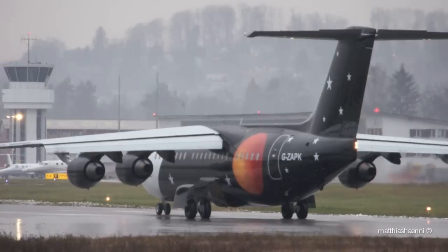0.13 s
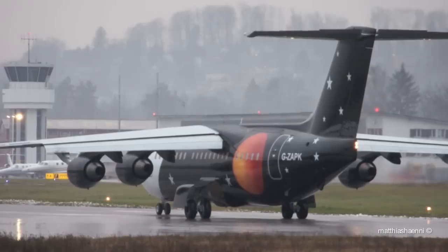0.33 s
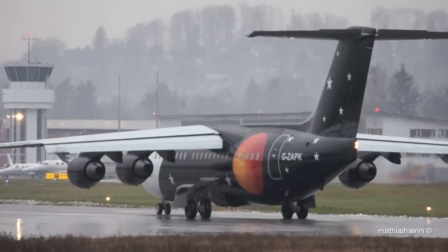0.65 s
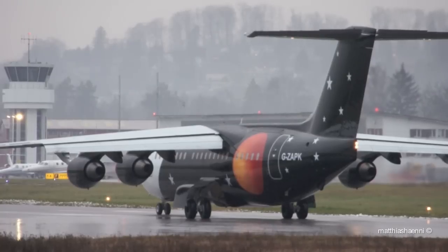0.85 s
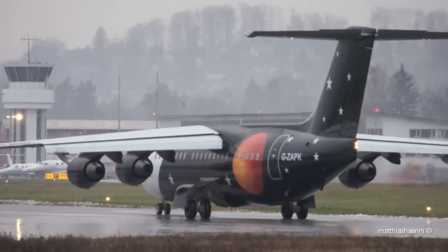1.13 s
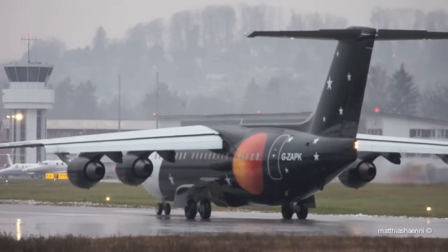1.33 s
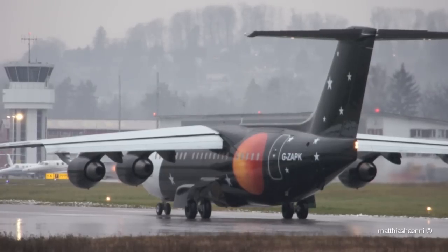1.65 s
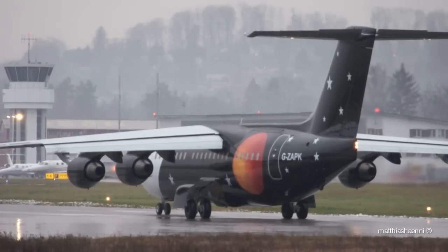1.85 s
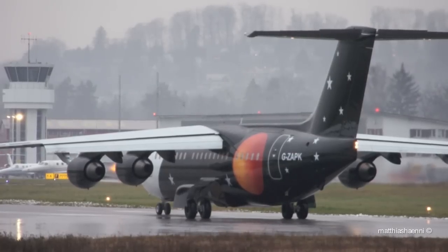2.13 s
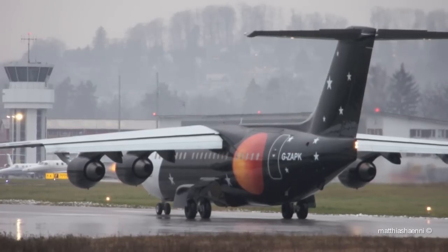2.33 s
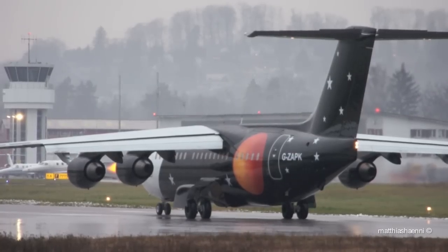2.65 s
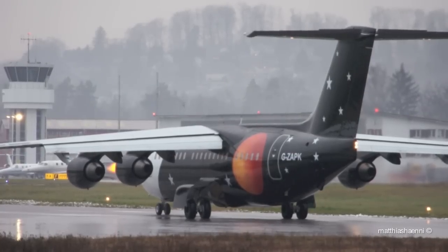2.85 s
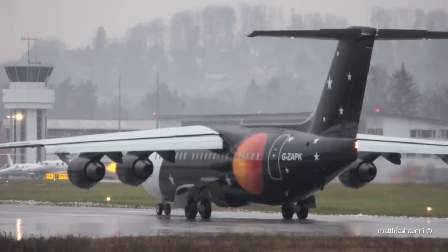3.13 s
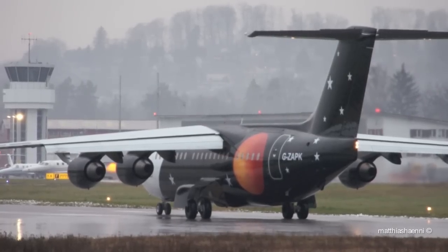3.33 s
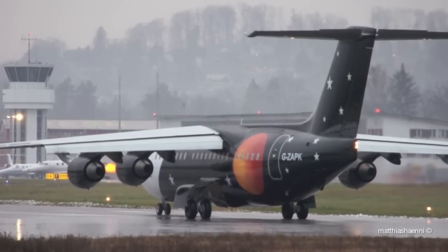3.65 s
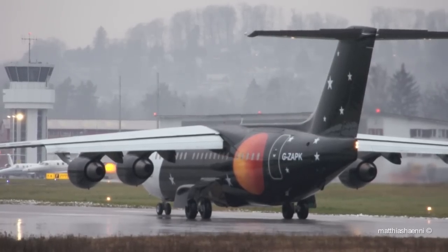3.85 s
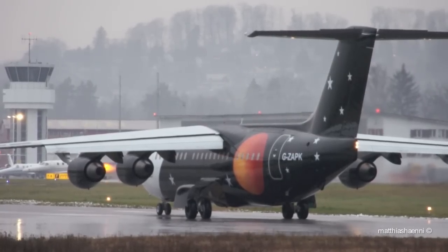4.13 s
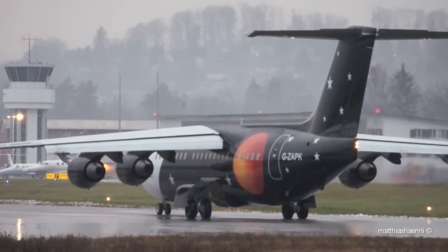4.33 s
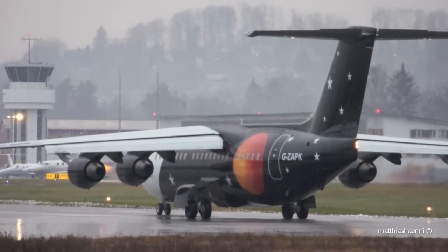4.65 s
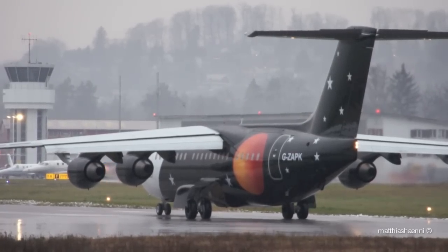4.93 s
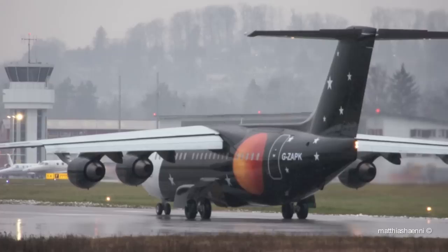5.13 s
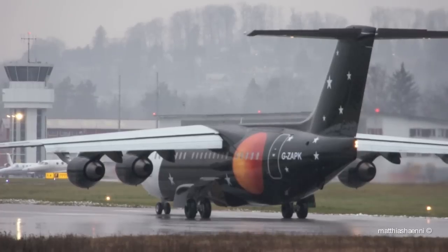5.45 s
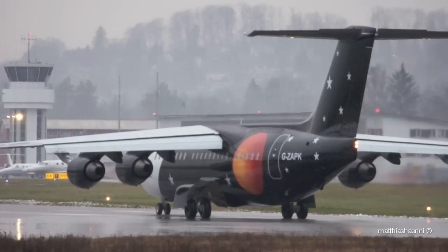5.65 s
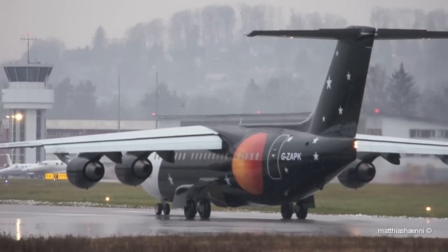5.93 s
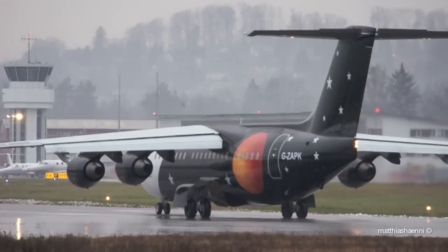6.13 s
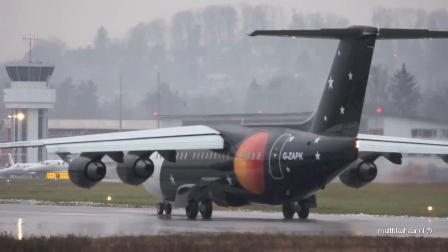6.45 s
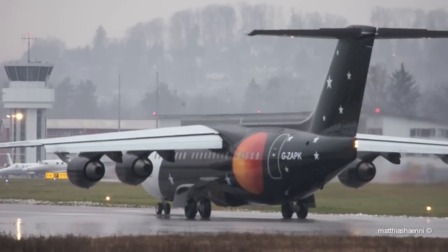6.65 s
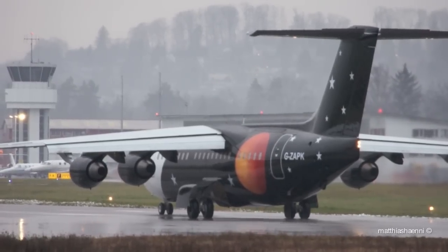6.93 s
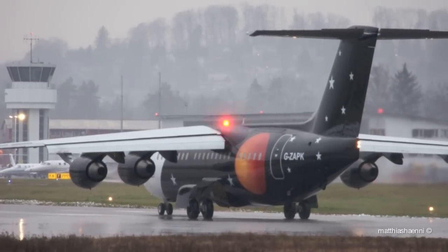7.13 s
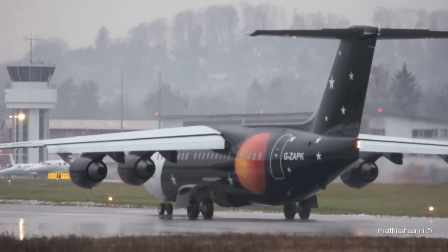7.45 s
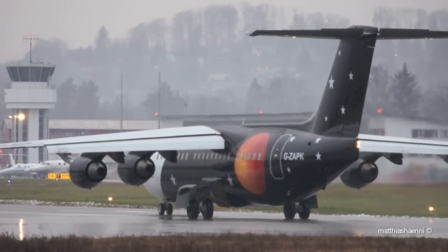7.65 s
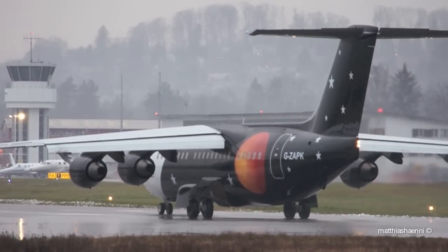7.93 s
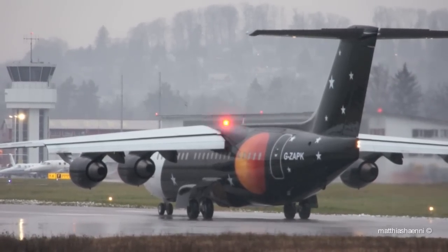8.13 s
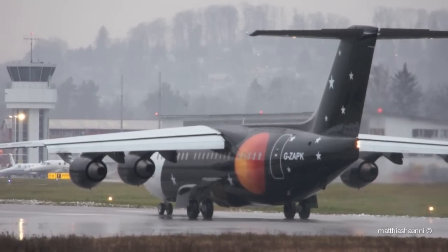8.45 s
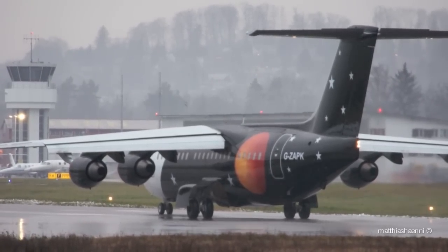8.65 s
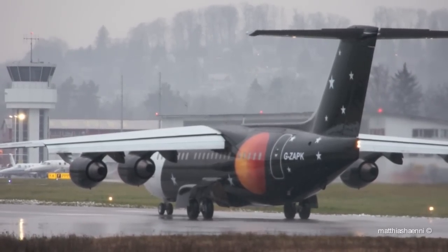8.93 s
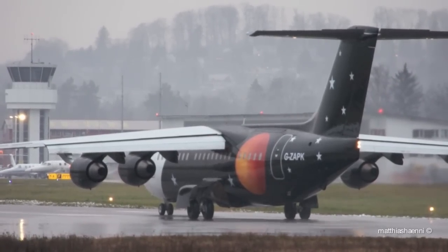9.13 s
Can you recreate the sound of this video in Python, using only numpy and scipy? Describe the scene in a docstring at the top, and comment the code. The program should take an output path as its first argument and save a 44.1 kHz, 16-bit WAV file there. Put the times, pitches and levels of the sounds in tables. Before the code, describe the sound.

Jet engines rise from a quiet, throbbing idle drone and thin whine to a piercing, breathy whistle over heavy, turbulent low rumble.

```python
"""A wet airfield: a four-engined jet airliner, seen from behind, spools up from idle.
The fans' blade tone, drifting phasors on a rising pitch, climbs from 1.6 to 4.4 kHz and swells in moving air;
faster engines add a breathy whistle above it. Two beating tones make a low idle drone, which drowns in the
growing rumble and roar of the exhaust, coloured noises driven by fan speed. Peaks drive the recorder's limiter."""
import sys
import numpy as np
from scipy import signal
from scipy.fft import rfft, irfft, next_fast_len
from scipy.io import wavfile
from scipy.ndimage import uniform_filter1d

SR = 44100
rng = np.random.default_rng(int(sys.argv[2]) if len(sys.argv) > 2 else 0)


def dump(signal):
    """Clip the signal to [-1, 1] and save it as 16-bit WAV at the path in sys.argv[1]."""
    limited = np.clip(np.atleast_2d(signal).T, -1, 1)
    pcm = np.round(limited * 32767).astype(np.int16)
    wavfile.write(sys.argv[1], SR, pcm)


N = 410130
TIME = np.arange(N) / SR  # s

# fan speed as blade-passing tone: (time [s], pitch [Hz])
FAN = [(0.0, 1574), (0.45, 1565), (0.85, 1619), (1.5, 1735), (2.0, 1861), (2.5, 1982), (3.0, 2212),
       (3.5, 2470), (4.0, 2670), (5.0, 3035), (6.0, 3450), (6.5, 3613), (7.0, 3812), (7.5, 3950),
       (8.0, 4095), (8.7, 4310), (9.3, 4440)]
# gusts on the upper exhaust noise and the fan tones: (time [s], peak [dB], length at half height [s])
GUSTS = [(.2, -0.5, .12), (1.08, -2, 0.11), (5.96, 2.5, 0.05), (6.04, -4, 0.11), (6.12, 1, 0.07),
         (6.2, -3.5, 0.03), (6.26, 2, 0.054), (6.49, 2.5, 0.027), (6.78, 3, 0.13), (6.97, -0.5, 0.032),
         (7.05, 3, 0.088), (7.26, 0.5, 0.042), (7.33, -4, 0.046), (7.53, 1, 0.06), (7.62, -4, 0.06),
         (7.74, 2.5, 0.053), (7.93, 0.2, 0.063), (8.08, -3, 0.045), (8.16, 3.5, 0.041), (8.4, 1.5, .04),
         (8.49, -1, 0.068), (8.63, 3, 0.13), (8.89, -1, 0.049), (9.27, -2.5, 0.039)]


def gain_of(db):
    """Decibels to amplitude."""
    return 10 ** (np.asarray(db) / 20)


def evened(x):
    """Scales to rms 1."""
    return x / np.sqrt(np.mean(abs(x) ** 2) + 1e-20)


def read(points, hz):
    """A spectrum table interpolated over log frequency."""
    f, value = np.transpose(points)
    return np.interp(np.log(hz + 1), np.log(f + 1), value)


def curves(rows):
    """Every column of a time table, sample by sample."""
    s, *columns = np.transpose(rows)
    return [np.interp(TIME, s, column) for column in columns]


def bumps(rows):
    """Gain of smooth swells and dips, each as long as its row says at half height."""
    return gain_of(sum(db * 2 ** -(2 * (TIME - s) / length_s) ** 2 for s, db, length_s in rows))


def phasor(hz):
    """Unit phasor that turns at the varying pitch hz."""
    return np.exp(2j * np.pi * np.cumsum(hz) / SR)


def wander(rate_hz, channels=2, order=2, clock=TIME):
    """Complex random drift of rms 1, with little in it faster than rate_hz on the given clock."""
    count = next_fast_len(N // 10)
    hz = np.fft.fftfreq(count, N / SR / count)
    a, b = rng.standard_normal((2, channels, count))
    slow = evened(np.fft.ifft((a + 1j * b) / (1 + abs(hz / rate_hz) ** order)))
    slow_s = np.linspace(0, N / SR, count)
    return np.array([np.interp(clock % (N / SR), slow_s, row) for row in slow])


def noise(colour, band_hz):
    """Two unrelated coloured noises, each with rms 1 inside the band."""
    size = next_fast_len(N, True)
    hz = np.fft.rfftfreq(size, 1 / SR)
    shape = gain_of(read(colour, hz))
    inside = (hz > band_hz[0]) & (hz < band_hz[1])
    power = np.sum(shape[inside] ** 2) / len(hz)
    white = rfft(rng.standard_normal((2, size)))
    return irfft(white * shape, size)[:, :N] / np.sqrt(power)


def patchy(x, depth_db, size=512):
    """Eddies along the path make neighbouring bands swell and fade together."""
    z = signal.stft(x, nperseg=size)[2]
    field = rng.standard_normal(z.shape[1:])
    for _ in range(2):
        field = uniform_filter1d(field, size=9, axis=0)  # over frequency
        field = uniform_filter1d(field, size=12, axis=1)  # over time
    return signal.istft(z * gain_of(depth_db * evened(field)), nperseg=size)[1][:, :N]


def follow_speed(knee_db, knee_hz, rise_db, fall_db, floor_db):
    """Noise gain against fan speed: one slope up to a knee, another beyond it, over a steady floor."""
    (blade_hz,) = curves(FAN)
    octaves = np.log2(blade_hz / knee_hz)
    slope_db = np.minimum(rise_db * octaves, -fall_db * octaves)
    return np.hypot(gain_of(knee_db + slope_db), gain_of(floor_db))


def drone(start_hz=67, end_hz=65.45, second_db=-11.0):
    """The combustors' low drone: two engines beat slowly against each other, and grow unsteady with power."""
    # (time [s], level [dB])
    drone_level = [(0, -25.5), (.28, -30), (.45, -24.5), (.8, -29), (1.05, -23), (1.38, -27.5),
                   (1.55, -24.5), (1.9, -28.5), (2.3, -26.5), (3.05, -22.5), (3.4, -25.5), (3.75, -25.5),
                   (5.3, -26), (5.8, -20), (6.3, -29), (7.3, -29), (9.3, -22)]
    beat_hz, swell_s = 3.78, .435  # swell_s: a time when both tones align
    hz = np.interp(TIME, [0, 3.5], [start_hz, end_hz])
    (level_db,) = curves(drone_level)
    beat = 1 + gain_of(second_db) * np.exp(-2j * np.pi * beat_hz * (TIME - swell_s))
    unrest = np.interp(TIME, [1.6, 3, 6], [.12, .5, 1.2])
    unsteady = (beat + unrest * wander(rate_hz=7, channels=1)[0]) / np.hypot(1, unrest)
    return np.sqrt(2) * gain_of(level_db) * (unsteady * phasor(hz)).real


def compressors(waver_rad=0.94):
    """Core compressors: two thin high whines that waver, climb and sink into the hiss."""
    # (time [s], pitch [Hz], pitch of a second engine [Hz], level [dB])
    compressor_rows = [(0, 5090, 5250, -45.5), (.4, 5095, 5250, -45.5), (.65, 5120, 5250, -49),
                       (.9, 5200, 5285, -51), (1.4, 5470, 5510, -52), (2.2, 5870, 5920, -58),
                       (2.55, 6020, 6060, -58), (2.75, 6110, 6140, -53), (3, 6280, 6320, -60),
                       (3.6, 6700, 6760, -66)]
    *pitches_hz, level_db = curves(compressor_rows)
    direct = np.interp(TIME, [.3, .9], [.75, .2])
    lines = 0
    for hz in pitches_hz:
        swing = np.sqrt(1 - direct ** 2) * wander(rate_hz=7.7)
        phase_rad = waver_rad * wander(rate_hz=3, channels=1, order=3)[0].real
        swing[0] += direct * np.exp(1j * phase_rad)
        lines = lines + swing * phasor(hz)
    return gain_of(level_db) * lines.real


def ducts():
    """Overtones and turbine tones rise with the shaft, each swelling and fading as its duct mode is passed."""
    # (multiple of blade tone, level [dB], width [Hz], strongest at blade tone [Hz], range [octaves])
    duct_tones = [(1.995, -43.3, 110, 1720, .11), (1.99, -41, 70, 1945, .07), (1.99, -39.5, 150, 2450, .14),
                  (2.003, -43.7, 125, 3250, .2), (2.29, -43.5, 280, 1710, .08),
                  (2.27, -40.5, 170, 2200, .09), (2.24, -50, 280, 2950, .14), (1.42, -47, 400, 1690, .08),
                  (1.51, -39, 380, 2560, .19), (3.0, -44.5, 1300, 1680, .08), (3.75, -50.5, 380, 1640, .07),
                  (3.69, -52, 160, 1780, .09), (4.2, -51, 900, 1690, .08), (3.99, -57, 160, 1910, .05),
                  (3.82, -54.5, 520, 2170, .06), (3.86, -55.5, 700, 2620, .08),
                  (4.54, -60.5, 90, 1700, .035)]
    (blade_hz,) = curves(FAN)
    turns, out = np.cumsum(blade_hz) / SR, np.zeros((2, N))
    for multiple, db, width_hz, best_hz, octaves in duct_tones:
        passed = np.exp(-.5 * (np.log2(blade_hz / best_hz) / octaves) ** 2)
        tone = wander(rate_hz=width_hz / 2) * np.exp(2j * np.pi * multiple * turns)
        out += gain_of(db) * passed * tone.real
    return np.sqrt(2) * out


def whistle(multiple=1.04, half_width_hz=280):
    """Turbulence chopped by the blades: a hump of noise just above the blade tone."""
    # (level at knee [dB], knee blade tone [Hz], rise [dB/octave], fall [dB/octave], floor [dB])
    whistle_law = (-28, 3230, 18.5, 41, -42.5)
    (blade_hz,) = curves(FAN)
    hump = wander(rate_hz=half_width_hz, order=3) * phasor(multiple * blade_hz)
    return follow_speed(*whistle_law) * evened(hump.real)


def far_fans(half_width_hz=140):
    """The faster, farther fans, smeared by the jets: a thin line in a breathy whistle, hiss at its octave."""
    # (time [s], blade tone [Hz], level [dB], level of its octave [dB])
    far_rows = [(0, 1743, -48, -61), (.6, 1779, -54, -48), (1.3, 1840, -47, -43), (1.8, 1935, -44, -42),
                (2.15, 2065, -53, -45), (2.5, 2241, -42, -48), (2.95, 2503, -49, -52),
                (3.3, 2676, -38, -47), (4, 2990, -53, -47), (5, 3377, -36, -47), (5.6, 3632, -32, -44),
                (6.3, 3908, -32, -46), (7.2, 4320, -39.5, -57), (8, 4430, -38.5, -60),
                (9.3, 4517, -37, -59)]
    hz, tone_db, octave_db = curves(far_rows)
    carrier = phasor(hz)
    clock = np.cumsum(hz / hz.mean()) / SR
    line = np.interp(TIME, [3.3, 5.5], [.7, .3]) * wander(rate_hz=28, clock=clock)
    tone = evened(line + wander(rate_hz=half_width_hz, clock=clock)) * carrier
    octave = wander(rate_hz=400, order=3, clock=clock) * carrier ** 2
    return np.sqrt(2) * (gain_of(tone_db) * tone + gain_of(octave_db) * octave).real


def exhaust(air_db=-76.5, gust_hz=15, gust_span_s=1.0):
    """Turbulent jets: big eddies throb and rumble, small ones roar and hiss, and gusts shake the upper part."""
    # noise colours: (frequency [Hz], density [dB per Hz])
    throb_colour, rumble_colour = [(5, -24), (15, -30), (28, -8.5), (42, -1.5), (60, 1.5), (75, 4),
                                   (110, -21), (200, -90), (1000, -130)], [(5, -36), (15, -33), (28, -36), (42, -19), (54, -9),
                                                  (74, 2.5), (100, 4.2), (118, 1.8), (145, -12), (250, -68),
                                                  (2000, -120)]
    upper_rumble_colour, body_colour = [(80, -30), (115, -7), (135, 1), (165, -1), (195, -7), (230, -13.5),
                                        (290, -24), (600, -91)], [(100, -36), (180, -1.5), (240, 1.5),
                                                              (300, 1.5), (400, 0), (520, -5), (700, -9.5),
                                                              (1200, -20), (3000, -70), (9000, -100)]
    roar_colour, hiss_colour = [(250, -7.5), (500, -6), (700, -1.5), (950, 1.5), (1080, 0.5), (1250, 2.5),
                                (1480, 0.5), (1700, -4.5), (2050, -6), (2700, -9), (4000, -9), (9000, -67)], [(900, -19), (2000, 7.5), (2900, 3.5), (3800, 6.7),
                                              (4400, 3.7), (4950, 4.7), (5450, -1.8), (6300, -2),
                                              (7300, -8.5), (8600, -13), (9500, -18.5), (10600, -21),
                                              (11400, -26), (12200, -38), (14000, -58)]
    air_colour = [(3000, -12), (9000, -2), (14500, 0), (15500, -6)]  # faint, above the hiss
    # speed laws: (level at knee [dB], knee blade tone [Hz], rise [dB/octave], fall [dB/octave], floor [dB])
    throb_law, rumble_law = (-19.5, 3100, 31, 0, -46), (-16.5, 3350, 12, -2.5, -43.5)
    upper_rumble_law, body_law = (-16.5, 3801, 18.5, 30, -50.5), (-27.5, 3661, 32, 26.5, -46)
    hiss_law = (-34.5, 3394, 10.5, 25.5, -63)
    # mid-range roar: (time [s], level [dB])
    roar_level = [(0, -40), (1.6, -36), (2.4, -36), (3.7, -29.5), (4.2, -31.5), (5.2, -29.5), (6.1, -26),
                  (6.8, -31.5), (9.3, -33.5)]
    # shake of the upper noise by small eddies: (time [s], depth [dB])
    flutter = [(0, 0.55), (5.5, 0.1), (9.3, 0.55)]
    # surges and lulls of the rumble: (time [s], peak [dB], length at half height [s])
    surges = [(.15, -1, 0.33), (1.05, 4, 0.15), (1.93, 1, 0.17), (2.28, -3.5, 0.22), (2.58, 1, 0.17),
              (3.1, 0.5, .15), (3.42, -3, 0.18), (3.9, -1.5, .25), (4.24, -5, 0.078), (4.44, -0.5, 0.069),
              (5.6, 0.05, 0.99), (7.61, -9, 0.015)]

    (roar_db,), (depth_db,) = curves(roar_level), curves(flutter)
    air_fade_db = np.interp(TIME, [5.5, 8.5], [0, -12])
    throb = follow_speed(*throb_law) * noise(throb_colour, (20, 100))
    rumble = follow_speed(*rumble_law) * noise(rumble_colour, (72, 135))
    upper_rumble = follow_speed(*upper_rumble_law) * noise(upper_rumble_colour, (125, 230))
    body = follow_speed(*body_law) * noise(body_colour, (240, 600))
    roar = gain_of(roar_db) * noise(roar_colour, (700, 1450))
    hiss = follow_speed(*hiss_law) * noise(hiss_colour, (4800, 9000))
    air = gain_of(air_db + air_fade_db) * noise(air_colour, (12000, 15000))

    drift = wander(rate_hz=gust_hz, channels=1)[0].real
    brief = drift - uniform_filter1d(drift, size=round(gust_span_s * SR))  # slow drift removed
    shake = gain_of(depth_db * evened(brief))
    upper = (body + patchy(roar + hiss, depth_db=0.28)) * shake * bumps(GUSTS)
    return (throb + rumble + upper_rumble) * bumps(surges) + upper + air


def fans(direct_at_idle=1.6, fading_db=-0.8):
    """Blade tones of engines that run nearly in step; the hot jets smear each into a fluttering line."""
    # (pitch as a factor on FAN, level re whine [dB], width as a share of pitch)
    fan_tones = [(1.002, -5, .007), (.991, -5, .01), (1.005, -5.5, .016), (1.0, -8, .04)]
    # (time [s], level [dB])
    whine_level = [(0, -36), (0.6, -41), (1.4, -39), (2.05, -39.5), (2.4, -35.5), (3.4, -32), (3.95, -34.5),
                   (4.7, -29.5), (5.5, -30.5), (6.2, -30), (6.8, -31), (7.5, -36.5), (8.4, -37.5),
                   (8.9, -44), (9.3, -46)]
    # swells and fades by moving air: (time [s], peak [dB], length at half height [s])
    whine_swells = [(0, -4, 0.055), (.07, -17, .05), (.21, -14, 0.073), (.32, 2, 0.08), (.55, 8.5, 0.11),
                    (.66, -1, 0.055), (.85, 6.5, .16), (1.08, -10, 0.07), (1.4, 4, 0.096), (2.35, 7, 0.14),
                    (2.7, 7, 0.052), (2.85, -3, .08), (3.15, 5, 0.074), (3.61, 8, 0.14), (4.23, 6, 0.11),
                    (4.72, -0.5, .08), (5.32, 6, 0.062), (5.58, 4, 0.085), (6.46, 6.5, 0.096),
                    (7.02, 5, 0.05), (7.4, 5, 0.1), (7.77, 4, 0.048), (8.42, 6.5, 0.1), (9.15, 12, 0.05)]
    (blade_hz,), (whine_db,) = curves(FAN), curves(whine_level)
    turns, typical_hz = np.cumsum(blade_hz) / SR, blade_hz.mean()
    clock = np.cumsum(blade_hz / typical_hz) / SR  # faster jets scatter faster, so the lines widen
    tones = 0
    for factor, db, width in fan_tones:
        smear = wander(rate_hz=width * typical_hz / 2, clock=clock)
        tones = tones + gain_of(db) * smear * np.exp(2j * np.pi * factor * turns)
    # while the jets are weak, much of the nearest fan's tone arrives unscattered
    direct = direct_at_idle * np.interp(TIME, [.9, 2.3, 7], [1, .35, .15])
    waver_rad = 1.3 * wander(rate_hz=8, channels=1, order=3)[0].real * blade_hz / typical_hz
    tones[0] += direct * np.exp(2j * np.pi * turns + 1j * waver_rad)
    # moving air makes the whine swell and fade a few times a second
    swell_db = fading_db * evened(wander(rate_hz=3.7, channels=1, order=4).real)
    level = np.sqrt(2 / (1 + direct ** 2)) * gain_of(whine_db + swell_db)
    return level * bumps(whine_swells) * tones.real


def microphones(pair):
    """Row 0 reaches both capsules; row 1 is the scattered part in which they differ."""
    # (frequency [Hz], left-right likeness [0-1])
    likeness = [(20, 0.99), (45, .997), (150, 0.99), (300, 0.95), (600, 0.91), (1500, 0.92), (1800, 0.83),
                (4500, 0.89), (5400, 0.85), (6300, 0.965), (10000, 0.98)]
    # (frequency [Hz], left minus right [dB])
    balance = [(35, -13), (60, -8), (110, -6.5), (220, -1.5), (420, -1.5), (630, 2), (820, -0.5),
               (1750, 3.3), (2700, 0.6), (4700, -0.6), (7000, 2), (9000, 0)]
    # (frequency [Hz], phase by which left leads [rad])
    lead = [(20, -.5), (60, -0.93), (120, -0.76), (280, -0.65), (520, -.25), (1500, -0.03), (1950, -.35),
            (3200, -0.29), (5400, 0.63), (9000, 0)]
    size = next_fast_len(N, True)
    hz = np.fft.rfftfreq(size, 1 / SR)
    shared, scattered = rfft(pair, size)
    same = np.clip(read(likeness, hz), 0, 1)
    shared = shared * np.sqrt((1 + same) / 2)
    scattered = scattered * np.sqrt((1 - same) / 2)
    ratio = gain_of(read(balance, hz)) * np.exp(1j * read(lead, hz))
    ports = np.array([(shared + scattered) * ratio, shared - scattered]) * 2 / abs(1 + ratio)
    return irfft(ports, size)[:, :N]


def scene():
    """All the engine sounds at the microphones."""
    engines = exhaust()
    engines = engines + (fans() + far_fans() + ducts() + whistle()) * bumps(GUSTS)
    engines = engines + compressors()
    engines[0] += drone()
    return microphones(engines)


def record(dry, ceiling_db=-3.0, recovery_db_per_s=60, edge_hz=15200):
    """A peak limiter ducks both channels at peaks above the ceiling, then recovers; a low-pass ends the band."""
    over_db = np.maximum(20 * np.log10(abs(dry).max(0) + 1e-9) - ceiling_db, 0)
    fall_db = TIME * recovery_db_per_s
    held_db = np.maximum.accumulate(over_db + fall_db) - fall_db
    limited = dry / gain_of(uniform_filter1d(held_db, size=90))
    low_pass = signal.firwin(511, edge_hz, window=("kaiser", 9), fs=SR)
    return signal.oaconvolve(limited, low_pass[None], "same")


dry = scene()
out = record(dry)
dump(out)
```